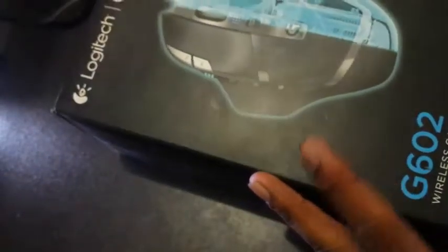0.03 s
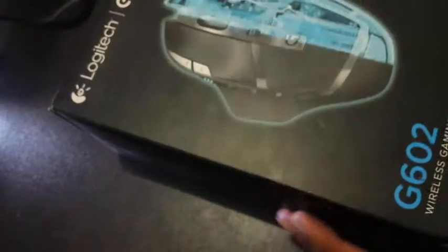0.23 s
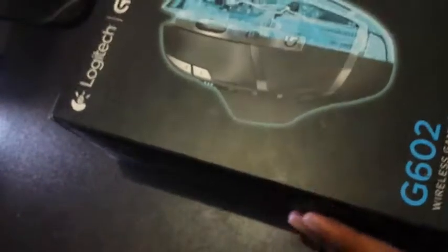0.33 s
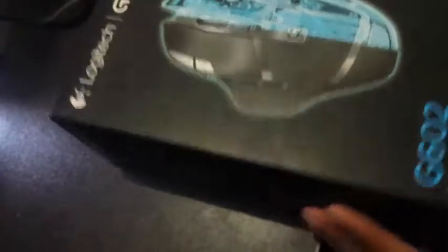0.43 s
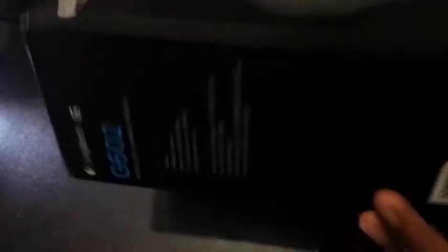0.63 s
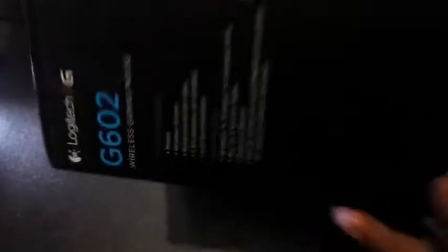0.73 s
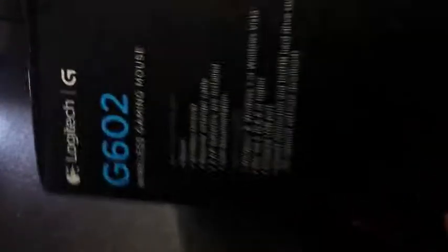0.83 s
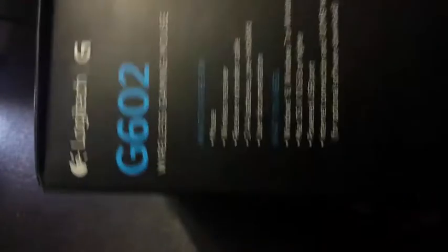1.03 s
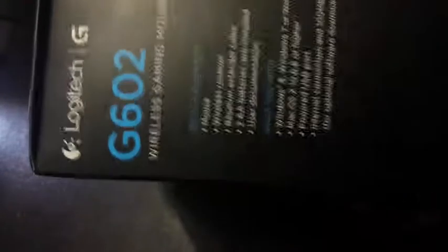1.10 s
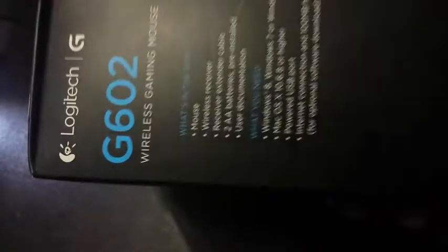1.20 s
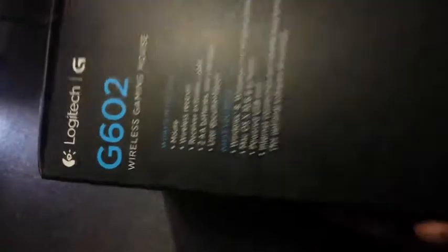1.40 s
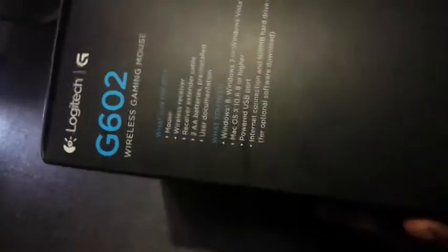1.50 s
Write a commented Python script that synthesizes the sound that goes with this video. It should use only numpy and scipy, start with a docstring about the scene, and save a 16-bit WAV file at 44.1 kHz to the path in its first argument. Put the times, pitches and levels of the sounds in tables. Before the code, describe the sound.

A cardboard box tips over with one sharp, hollow knock, then slides softly.

```python
"""A cardboard box tips onto a table close to the microphone and lands with one sharp, hollow knock:
a push of trapped air, the ring of the box and the slap of card. A small room answers with dull
reflections, a diffuse tail and two low standing waves. The box then slides with a grainy hiss.
Fingers bump it softly, once before the knock and twice after. A fan hums and hisses faintly throughout."""
import sys
import numpy as np
from scipy import signal
from scipy.fft import rfft, irfft, next_fast_len
from scipy.io import wavfile
from scipy.ndimage import map_coordinates

SR = 44100
rng = np.random.default_rng(int(sys.argv[2]) if len(sys.argv) > 2 else 0)


def wav_out(sig):
    """Save sig, one row per channel (or a flat mono array), as 16-bit PCM at SR to the path in sys.argv[1]."""
    wavfile.write(sys.argv[1], SR, np.round(np.clip(np.atleast_2d(sig).T, -1, 1) * 32767).astype(np.int16))


N = 68355

# The fan's hum. Each row: pitch in Hz, level in dB, waver in dB.
FAN_TONES = [(161.1, -54, 5), (318.9, -46, 1)]
# Finger bumps on the box. Each row: centre in seconds, length in seconds, level in dB.
FINGER_BUMPS = [(0.194, 0.045, -37), (1.207, 0.042, -41), (1.364, 0.032, -43.5)]
# The hollow ring of the box. Each row: pitch in Hz, relative level in dB, T60 in seconds.
BOX_MODES = [(101, -29, 0.045), (171.7, -16.5, 0.074), (224.6, -13.5, 0.043), (327, -19.5, 0.02),
             (486, -34, 0.069), (603, -13.5, 0.019), (818, -18.5, 0.025), (995, -13, 0.014),
             (1050, -15.5, 0.0085), (1290, -22, 0.024), (1945, -16.5, 0.013), (3560, -16.5, 0.018),
             (3950, -20, 0.0076), (6900, -22.5, 0.023)]
# Bounces off near surfaces. Each row: delay in seconds, bass level in dB.
REFLECTIONS = [(.0034, -7.5), (.0063, -11.5), (0.0113, -9)]
# How long the room rings. Each row: frequency in Hz, T60 in seconds.
TAIL_DECAY = [(100, 0.79), (300, 0.49), (1000, 0.52), (3000, 0.41), (8000, 0.62), (15000, 0.58)]
# The room's standing waves. Each row: pitch in Hz, level in dB, T60 in seconds.
STANDING_WAVES = [(160.9, -14.5, 0.25), (312, -19.5, 0.24)]
# The sliding stroke. Each row: time in seconds, relative hiss level in dB, relative sizzle level in dB.
SLIDE_STROKE = [(.33, -66, -64), (.4, -49.5, -56.5), (.475, -62, -68), (.52, -50.5, -58.5), (.58, -44, -56),
                (.645, -43.5, -53), (0.692, -50, -58.5), (.76, -47, -58), (.85, -46.5, -57),
                (.91, -43, -47.5), (.975, -48, -53.5), (1.01, -50, -64), (1.18, -59.5, -68)]

# The tone colour of each noise layer. Each row: frequency in Hz, relative spectral density in dB.
FAN_EQ = [(15, -49), (25, -27.5), (102, -12.5), (175, -8.5), (263, -6), (326, -2), (384, -10.5),
          (624, -11.5), (796, -16), (911, -15), (1130, -20), (3430, -28.5), (3920, -28.5), (5280, -26.5),
          (6560, -30), (7510, -26), (10700, -38.5), (14800, -35.5), (16000, -46)]
BUMP_EQ = [(50, -28), (130, -14.5), (200, 2), (300, 2), (450, -6), (900, -10), (1600, -21), (5000, -30),
           (15000, -48)]
CRACK_EQ = [(100, -22), (400, 2.5), (1200, -13), (1700, -5), (2600, -3.5), (3500, 3), (4800, -2.5),
            (6500, -4.5), (9000, -14), (15000, -28.5)]
TAIL_EQ = [(30, -36), (60, -18), (95, -8), (160, -6.5), (200, -11.5), (310, 0), (390, -12), (540, -5.5),
           (720, -12), (1100, -6.5), (1600, -19.5), (2600, -23), (3500, -20.5), (4500, -24), (8000, -30),
           (11000, -41), (16000, -46)]
HISS_EQ = [(300, -15), (1200, -10.5), (2200, -8), (3300, -7.5), (4400, -5), (5400, 0), (6300, -2),
           (7500, -3.5), (9000, -9.5), (11000, -23), (16000, -37)]
SIZZLE_EQ = [(5000, -40), (8000, -6.5), (10000, -2), (13000, -7), (16000, -13)]

# Where each layer leans in the stereo image. Each row: frequency in Hz, left minus right in dB.
FAN_BALANCE = [(60, -5), (110, 2), (200, -2), (380, 0.5), (700, 1), (1290, 0), (2380, 0.5), (4400, 3.5),
               (8120, -9.5), (15000, -1.5)]
KNOCK_BALANCE = [(700, -1.5), (4400, -2.5), (8100, -12), (15000, 0)]
TAIL_BALANCE = [(1000, 0.5), (4400, 1.5), (8100, -10.5), (15000, -9)]
SLIDE_BALANCE = [(700, 16), (2400, -1), (4400, 7), (8100, -6.5), (15000, -1.5)]

# Stereo width of the noises. Each row: frequency in Hz, left-right likeness (1 is mono, 0 is wide).
AIR_LIKENESS = [(60, 0.98), (130, 0.92), (290, 0.94), (640, 0.42), (1410, -0.15), (3100, 0.11),
                (6820, -0.0017), (15000, -0.02)]
ROOM_LIKENESS = [(100, 0.98), (400, 0.91), (1000, 0.19), (2000, 0.062), (8000, 0)]
CRACK_LIKENESS = [(300, 0.54), (1000, 0), (3000, 0.81), (8000, 0.69)]

KNOCK_S = 0.2498  # the box lands


def amp(db):
    """Decibels to gain."""
    return 10 ** (np.asarray(db) / 20)


def along(points, hz):
    """Read a curve of (Hz, value) points on a log frequency axis."""
    freqs, values = np.transpose(points)
    return np.interp(np.log(hz + 1), np.log(freqs + 1), values)


def since(start_s):
    """Seconds since the start for every sample, 0 before it."""
    return np.maximum(np.arange(N) / SR - start_s, 0)


def wobble(rate):
    """A smooth random curve with `rate` knots a second."""
    return map_coordinates(rng.standard_normal(N // 8), [np.arange(N) * rate / SR + 2], mode="wrap")


def filtered(x, response):
    """Filter x by a complex response, given as a function of Hz."""
    size = next_fast_len(N + SR // 2)
    return irfft(rfft(x, size) * response(np.fft.rfftfreq(size, 1 / SR)), size)[..., :N]


def noise(eq, likeness):
    """Stereo noise of rms 1 with a given colour and width."""
    def mid_side_gains(hz):
        angle = np.arccos(np.clip(along(likeness, hz), -1, 1)) / 2
        return amp(along(eq, hz)) * [np.cos(angle), np.sin(angle)]
    mid, side = filtered(rng.standard_normal((2, N)), mid_side_gains)
    stereo = np.array([mid + side, mid - side])
    return stereo / np.sqrt(np.mean(stereo ** 2) + 1e-20)


def panned(x, balance):
    """Lean each frequency left or right."""
    return filtered(x, lambda hz: amp(np.outer([.5, -.5], along(balance, hz))))


def ring(modes, t):
    """Struck resonances: sines that each fall 60 dB in their T60."""
    return sum(amp(db - 60 * t / t60) * np.sin(2 * np.pi * hz * t) for hz, db, t60 in modes)


def fan():
    """A steady bed of air noise under two tones that waver in level and phase."""
    drift_rad, air_db = 0.39, -43.5
    hum = np.zeros(N)
    for hz, db, waver_db in FAN_TONES:
        level = amp(db + waver_db * wobble(rate=17.2))
        hum += level * np.sin(2 * np.pi * hz * since(0) + drift_rad * wobble(rate=18))
    return hum + amp(air_db) * panned(noise(FAN_EQ, AIR_LIKENESS), FAN_BALANCE)


def finger_bumps():
    """Soft finger contacts swell and fade in the hollow of the box."""
    force = sum(amp(db) * np.exp(-2 * ((since(0) - centre_s) / length_s) ** 2)
                for centre_s, length_s, db in FINGER_BUMPS)
    return force * noise(BUMP_EQ, ROOM_LIKENESS)


def box_knock():
    """Air is squeezed from under the box, its hollow body rings and the card cracks on the table."""
    t = since(KNOCK_S)
    push_db, push_s = -5, 0.00039
    u = t / push_s
    push = amp(push_db) * np.e * u * (1 - u / 2) * np.exp(-u)

    graze_db, graze_lead_s = -10, 0.0015  # an edge touches just before the blow
    graze = amp(graze_db) * (since(KNOCK_S - graze_lead_s) > 0)
    crack_db, hold_s, t60_s = -13.5, 0.0013, 0.0089
    slap = amp(-60 * since(KNOCK_S + hold_s) / t60_s)
    crack = amp(crack_db) * np.where(t > 0, slap, graze) * noise(CRACK_EQ, CRACK_LIKENESS)

    knock = panned(push + ring(BOX_MODES, t) + crack, KNOCK_BALANCE)
    right_lead_s = 0.00006  # the box is nearer the microphone's right side
    knock = filtered(knock, lambda hz: np.exp(np.outer([-1, 1], 1j * np.pi * hz * right_lead_s)))
    low_cut = signal.butter(4, 86, "high", fs=SR, output="sos")  # deep bass below about 86 Hz is cut from the knock
    return signal.sosfilt(low_cut, knock)


def room_reverb(knock):
    """Near surfaces throw back dull copies of the knock; a diffuse noise tail builds and dies away."""
    dull_above_hz, tail_db, build_s = 594, -23.5, 0.0044
    def walls(hz):
        bounces = sum(amp(db) * np.exp(-2j * np.pi * hz * delay_s) for delay_s, db in REFLECTIONS)
        return bounces / (1 + 1j * hz / dull_above_hz)
    early = filtered(knock, walls)

    hz, t, bands = signal.stft(noise(TAIL_EQ, ROOM_LIKENESS), SR, nperseg=512)
    fade = amp(tail_db - 60 * np.maximum(t - KNOCK_S, 0) / along(TAIL_DECAY, hz)[:, None])
    tail = signal.istft(bands * fade, SR, nperseg=512)[1][:, :N]
    build = 1 - np.exp(-(since(KNOCK_S) / build_s) ** 2)
    return early + panned(tail, TAIL_BALANCE) * build


def standing_waves(build_s=0.044):
    """Low room modes bloom after the knock and fade."""
    t = since(KNOCK_S)
    bloom = 1 - np.exp(-(t / build_s) ** 2)
    return bloom * ring(STANDING_WAVES, t)


def box_slide(trim_db=2, grain_db=1.5):
    """Smooth card rubs: a fine, grainy hiss with a sizzle on top, brightest where the stroke is fastest."""
    times, hiss_db, sizzle_db = np.transpose(SLIDE_STROKE)
    def fader(db):
        return amp(trim_db + np.interp(since(0), times, db, left=-120, right=-120))
    hiss = fader(hiss_db) * noise(HISS_EQ, AIR_LIKENESS)
    sizzle = fader(sizzle_db) * noise(SIZZLE_EQ, AIR_LIKENESS)
    grain = amp(grain_db * wobble(rate=250))
    return panned(grain * (hiss + sizzle), SLIDE_BALANCE)


def scene():
    """The mix: the knock in its room, the handling and the fan."""
    knock = box_knock()
    return knock + room_reverb(knock) + standing_waves() + box_slide() + finger_bumps() + fan()


def record(dry):
    """A soft clip rounds off the highest peak, then a steep high cut closes the top end."""
    high_cut_hz = 15850
    rounded = dry / (1 + np.abs(dry) ** 6) ** (1 / 6)
    return filtered(rounded, lambda hz: 1 / (1 + (hz / high_cut_hz) ** 120))


dry = scene()
out = record(dry)
wav_out(out)
```